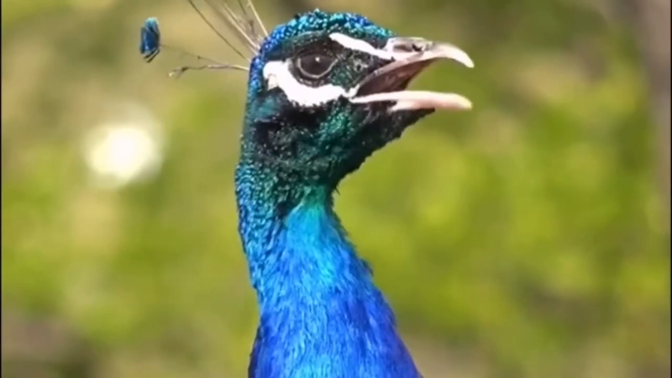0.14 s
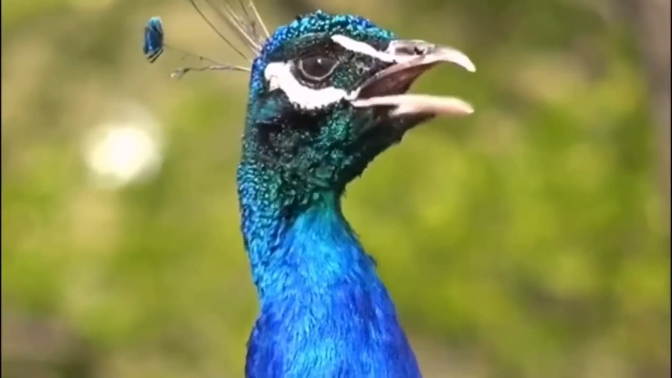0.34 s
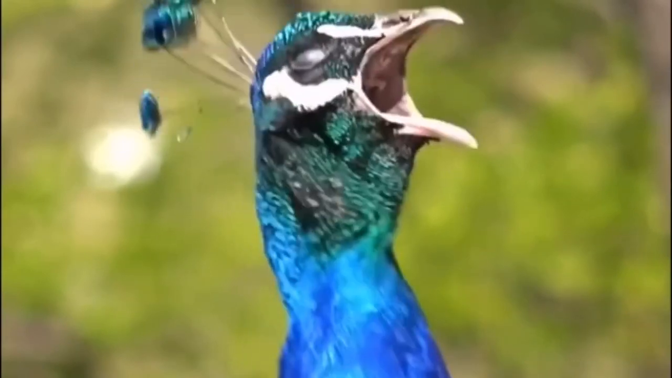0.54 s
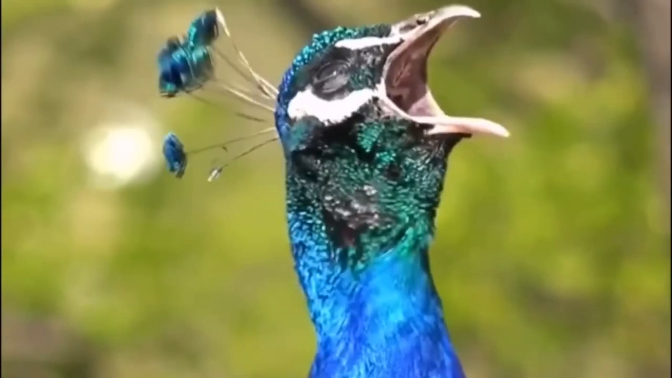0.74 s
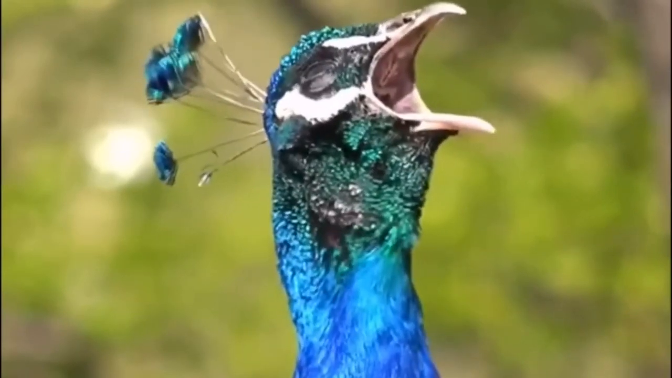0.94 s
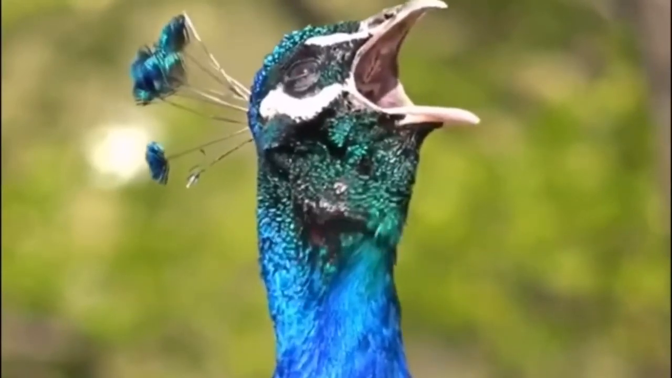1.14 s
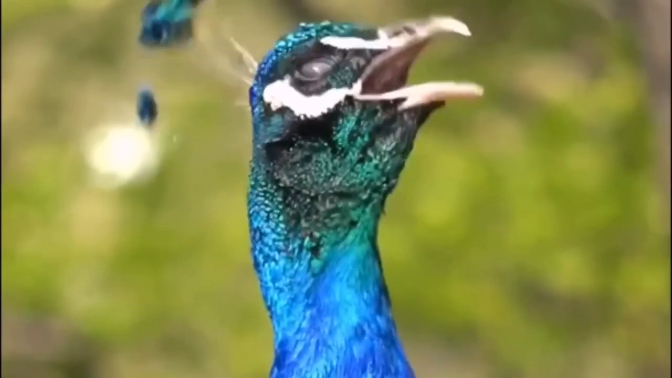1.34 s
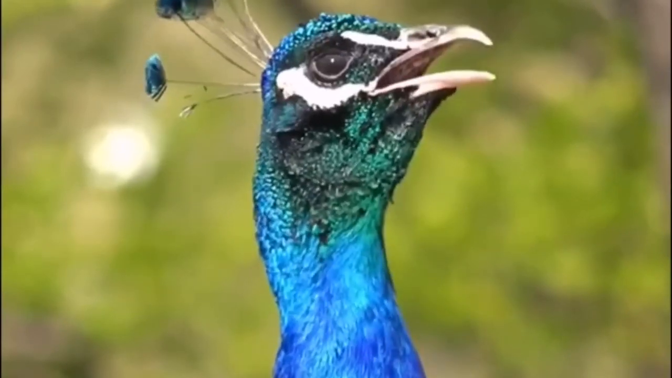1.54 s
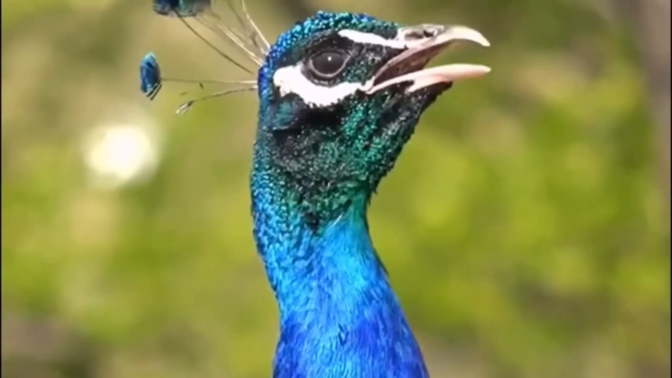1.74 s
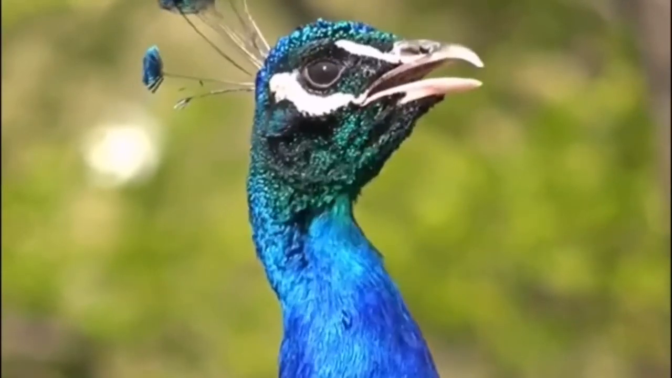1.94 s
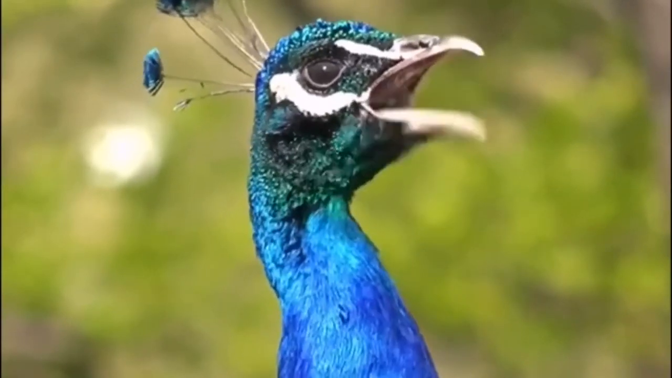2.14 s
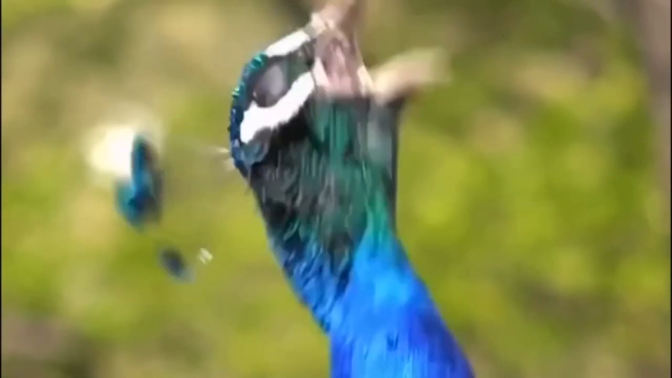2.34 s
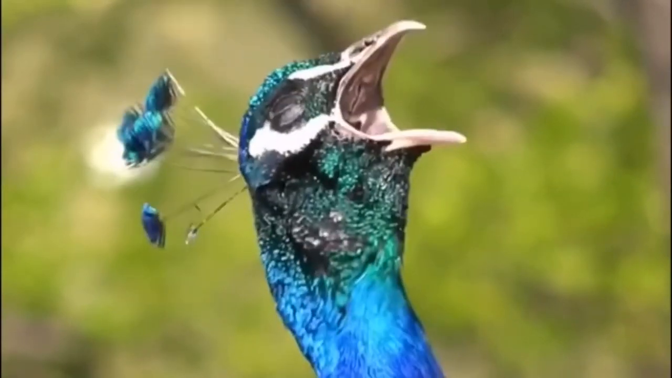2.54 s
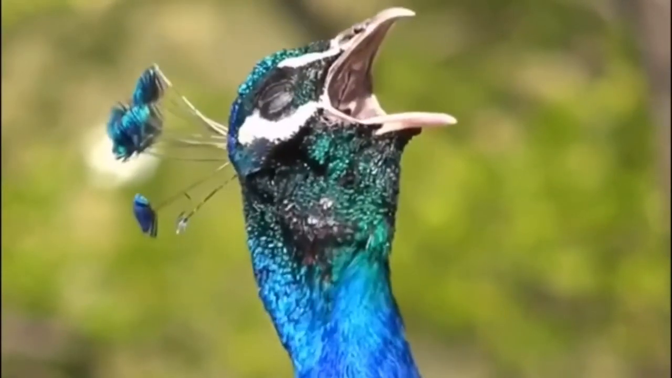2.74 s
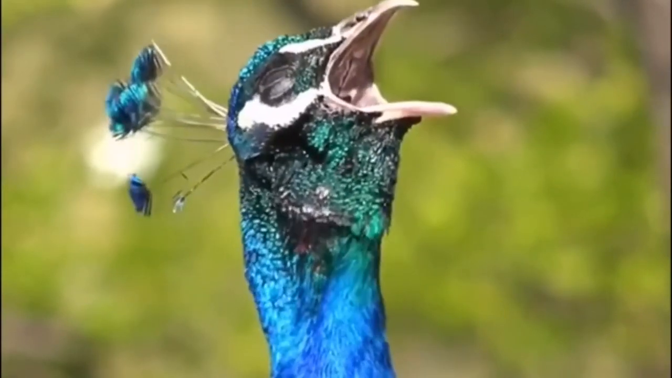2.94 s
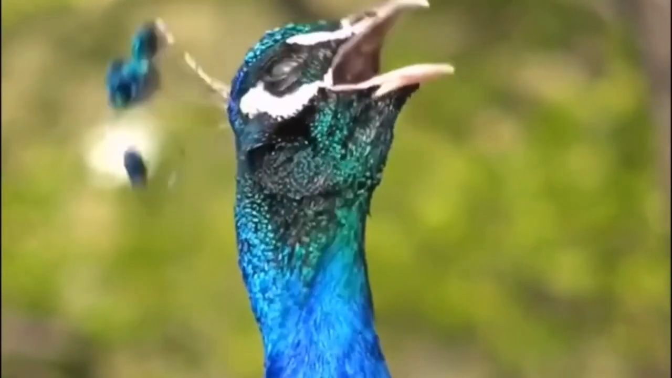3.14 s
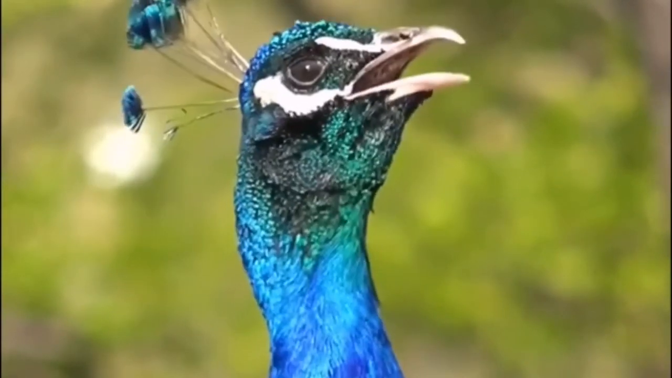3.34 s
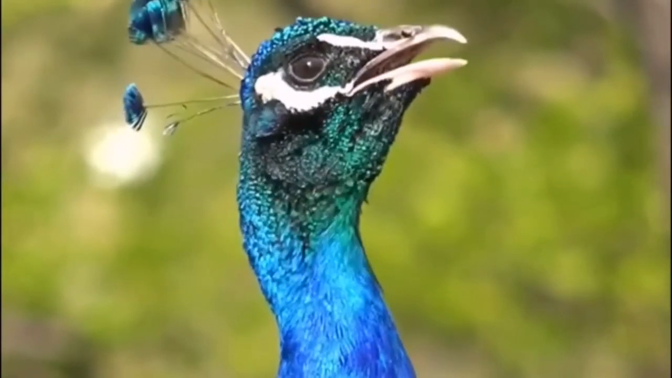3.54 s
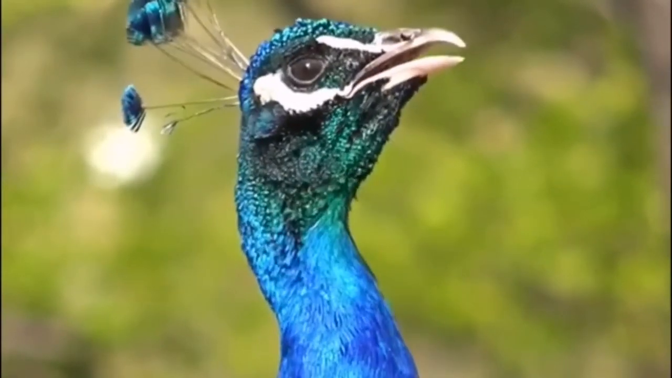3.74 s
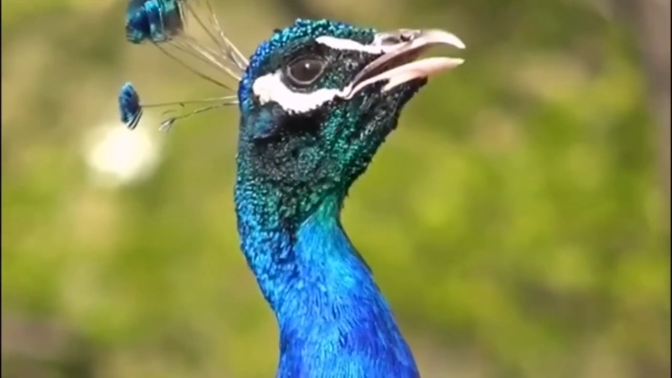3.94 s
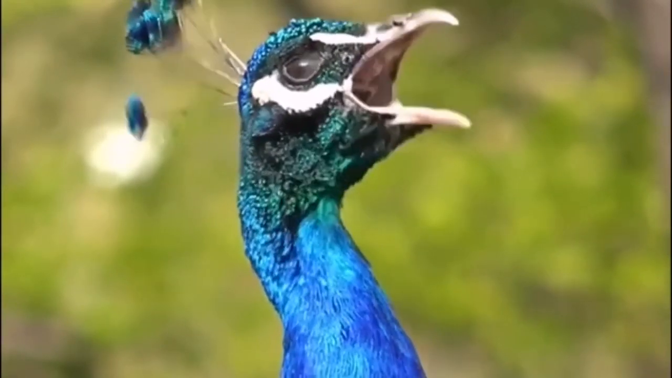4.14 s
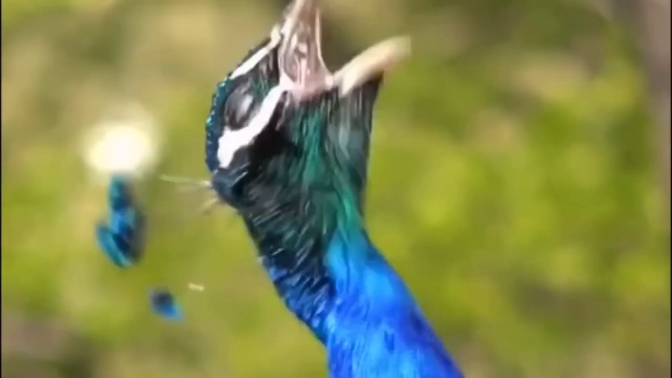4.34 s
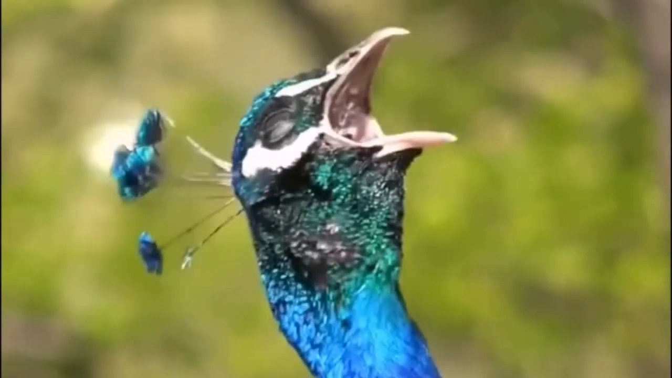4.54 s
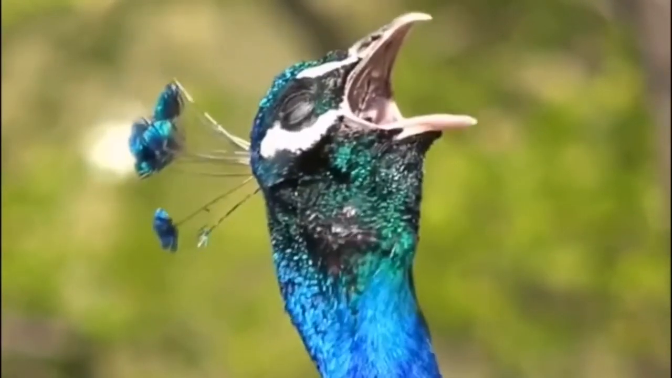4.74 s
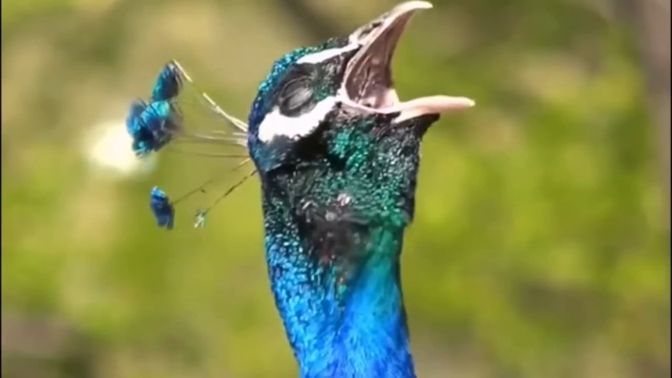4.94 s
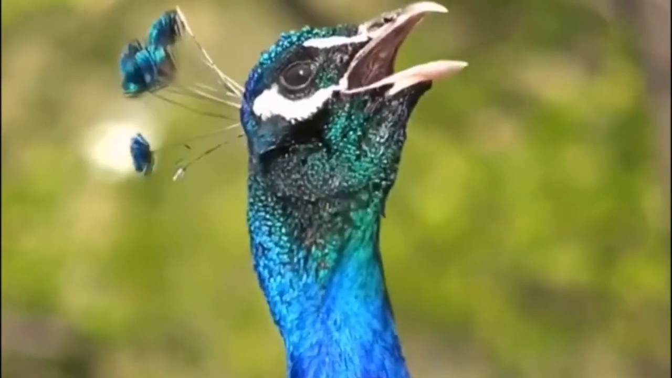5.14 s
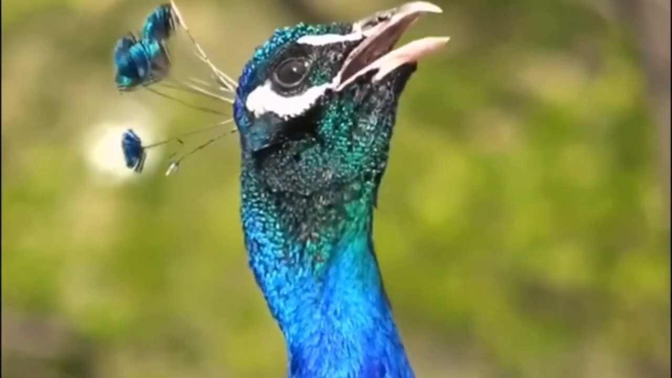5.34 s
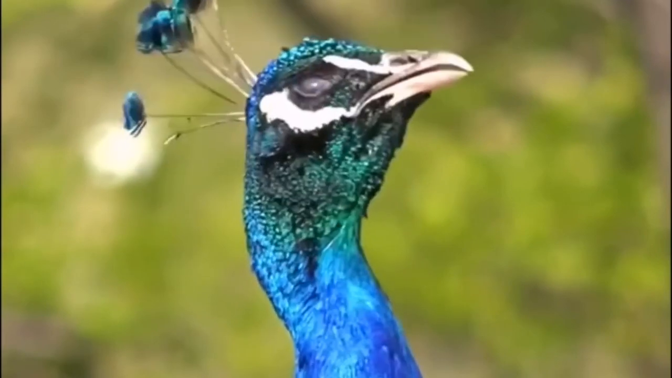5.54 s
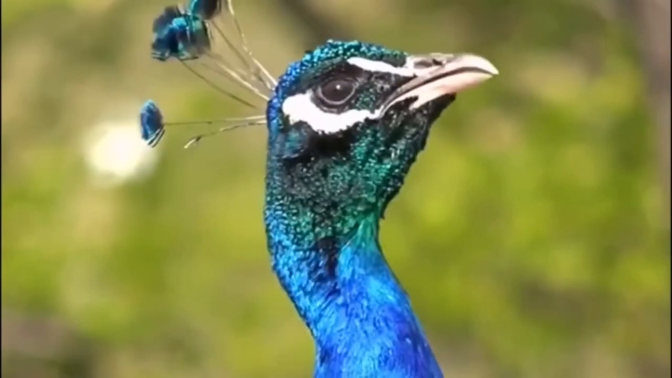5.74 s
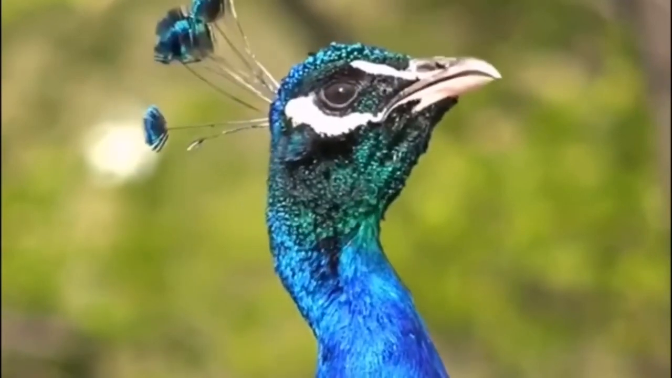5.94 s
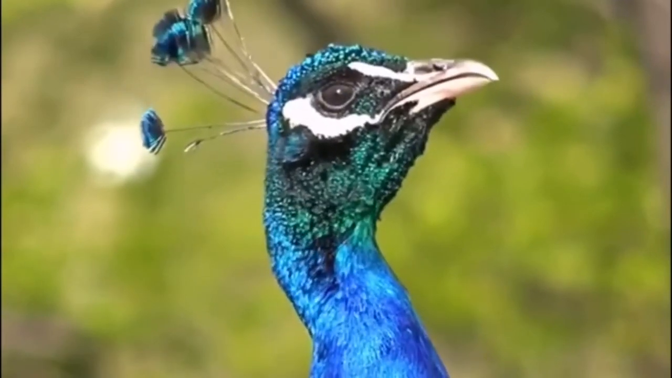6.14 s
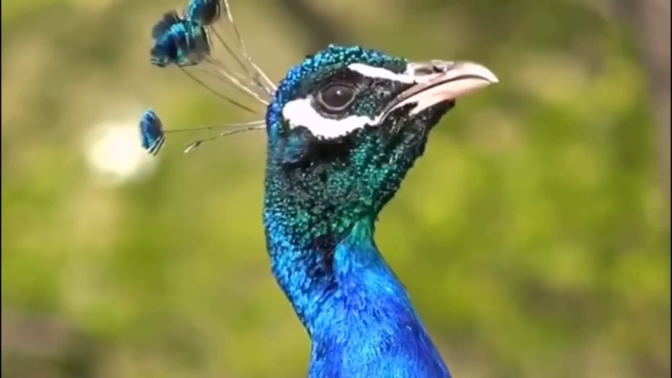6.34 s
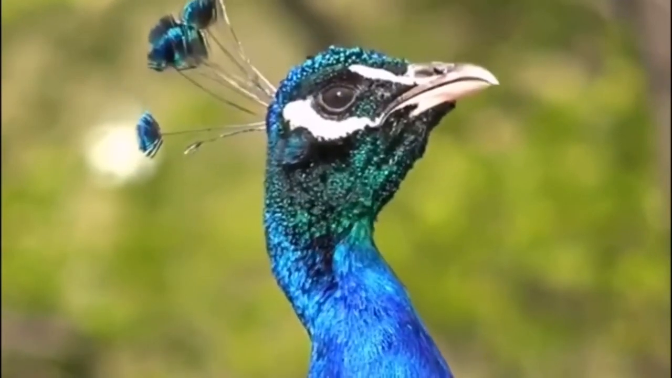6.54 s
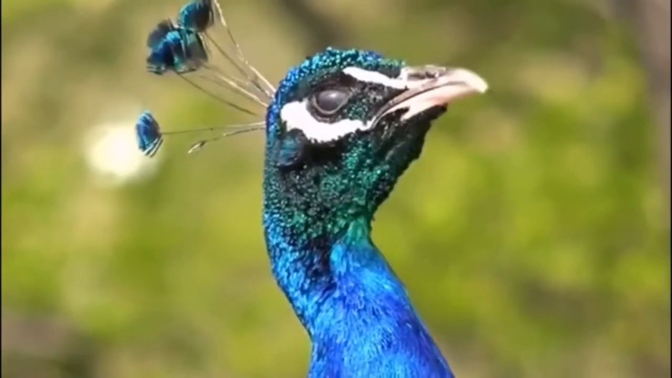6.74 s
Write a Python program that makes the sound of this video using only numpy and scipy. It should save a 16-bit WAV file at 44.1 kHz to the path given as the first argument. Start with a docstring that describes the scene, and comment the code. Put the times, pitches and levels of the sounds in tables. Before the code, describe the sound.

Outdoors in a leafy park, a nearby peacock gives three loud, nasal screams about two seconds apart. Each slides up hoarsely, breaks into a clear held note, then droops in pitch and stops, leaving echoes in the trees. Faint songbird chirps and soft hisses appear between calls over distant traffic rumble and a low hum. The close stereo pickup turns the background down under the cries, then lets it recover.

```python
"""A peacock screams three times in a park: a stack of partials glides up, breaks into a held note and sinks.
Delayed reflections and a tail from trees let the gliding tone beat against its own echoes.
Songbirds (gliding sines), puffs of high hiss, far traffic (shaped noise) and a hum (a narrow noise band)
fill the pauses; gain control, driven by the power of the mix, turns everything down under the screams.
The two channels differ in a balance that depends on frequency and time."""
import sys
import numpy as np
from scipy import signal
from scipy.fft import rfft, irfft, next_fast_len
from scipy.io import wavfile
from scipy.ndimage import uniform_filter1d

SR = 44100
rng = np.random.default_rng(int(sys.argv[2]) if len(sys.argv) > 2 else 0)


def wrap_up_sound(samples):
    """Save the sound to the file named by the first command line argument, as 16-bit audio."""
    columns = np.atleast_2d(samples).T
    # keep every value between -1 and 1, then stretch to whole-number steps
    tamed = np.clip(columns, -1, 1)
    steps = np.round(tamed * 32767).astype(np.int16)
    wavfile.write(sys.argv[1], SR, steps)


N = 299439
FADE_S = 6.675  # start of the fade-out, where the rumble is at its height


def gain_of(db):
    """Converts a level in decibels to an amplitude factor."""
    return 10 ** (np.asarray(db) / 20)


def evened(x):
    """Normalizes a signal to unit rms."""
    return x / np.sqrt(np.mean(x ** 2) + 1e-20)


def read(points, hz):
    """Interpolates a spectrum linearly along a logarithmic frequency axis."""
    f, value = np.transpose(points)
    return np.interp(np.log(hz + 1), np.log(f + 1), value)


def add(mix, s, sound):
    """Superposes a sound on the mix at time s, in place."""
    part = mix[round(s * SR):][:len(sound)]
    part += sound[:len(part)]


def coloured(x, gain):
    """Filters by multiplying the spectrum with a gain given as a function of frequency."""
    size = next_fast_len(x.shape[-1])
    spectrum = rfft(x, size) * gain(np.fft.rfftfreq(size, 1 / SR))
    return irfft(spectrum, size)[..., :x.shape[-1]]


def wobble(count, width):
    """Smooth random modulation of unit rms: white noise averaged twice over width samples."""
    once = uniform_filter1d(rng.standard_normal(count), int(width))
    return evened(uniform_filter1d(once, int(width)))


def scream(row, pitch):
    """Source-filter voice: harmonic partials and breath pass a throat that narrows once the top note is reached."""
    # throat resonances while the pitch climbs: (frequency [Hz], relative gain [dB])
    climb = [(500, -42.5), (650, -31), (1100, -34.5), (1300, -31), (1650, -32.5), (1900, -19.5), (2250, -9),
             (2600, -27.5), (2950, -9), (3150, -19.5), (3450, -42), (3950, -30), (4350, -27), (4750, -39),
             (5200, -33), (5800, -36), (6200, -34), (15000, -71)]
    # throat resonances while the note is held and sinks: (frequency [Hz], relative gain [dB])
    hold = [(520, -49.5), (690, -33.5), (1050, -22), (1400, -17.5), (1700, -35), (1950, -43), (2150, -43),
            (2450, -44), (2720, -39), (3300, -32), (4300, -40.5), (5400, -37.5), (7000, -52.5),
            (8300, -56.5), (10500, -51), (15000, -60.5)]
    # strength of partials 1 to 11 of the held note at the source: relative level [dB]
    folds_db = [0, -1.5, 4.5, 3, -7, 0.5, 7.5, 8, -0.5, -1.5, 0]
    # narrow gaps in the voice's spectrum: (centre [Hz], width at half depth [Hz], depth [dB])
    gaps = [(2820, 105, 20), (3680, 120, 15.5), (4803, 334, 15), (5770, 280, 16)]
    # course shared by all screams, before each scream's own offsets; stage 0 is the start, 1 the break, 2 the end:
    # (stage [1], two lowest partials [dB], overtones [dB], treble [dB], throat width [0-1])
    course = [(0, -30.5, -28.5, -65, 1), (.25, -26, -19.5, -55, .93), (.55, -26, -15, -39.5, 0.88),
              (1, -22.5, -16.5, -41, 0.78), (1.02, -17, -21.5, -37.5, 0.74), (1.06, -13, -23, -39, 0.37),
              (1.14, -13, -23.5, -32.5, 0.48), (1.3, -13.5, -24.5, -36.5, 0.19),
              (1.62, -10.5, -31, -53.5, 0.05), (1.8, -14.5, -32, -50, .16), (1.92, -19, -29, -48.5, .5),
              (1.976, -30, -35.5, -53.5, 0.42), (2.001, -41.5, -49.5, -65, .5)]
    treble_hz = 6000  # lower limit of the treble group
    dulling = .45  # dB per octave that the voice darkens for each dB that the treble weakens
    surge_db = 2.2  # rms at full throat width
    attack_s, release_s = 0.0099, .015
    breath_climb_db, breath_hold_db = -9, -27  # against the treble, throat wide and narrow
    burst_delay_s, burst_s = .015, .015  # peak after the break, Gaussian half-width at 1/e

    snap, level_db, climb_db, extra_db, burst_db = row
    start, end = pitch[0][0], pitch[-1][0]
    t = np.arange(start, end, 1 / SR)
    stage = np.interp(t, [start, snap, end], np.arange(3))
    at, *columns = np.transpose(course)
    low_db, overtones_db, treble_db, wide = (np.interp(stage, at, c) for c in columns)
    treble_db = treble_db + extra_db
    wide = np.clip(wide, 0, 1)

    hz = uniform_filter1d(np.interp(t, *np.transpose(pitch)), size=700, mode="nearest")
    hz = hz * (1 + .0004 * wobble(len(t), width=300))
    k = np.arange(1, 29)[:, None]  # partial numbers
    f = k * hz

    source_db = np.interp(k, 1 + np.arange(len(folds_db)), folds_db)
    throat = gain_of(wide * read(climb, f) + (1.5 - wide) * (read(hold, f) + source_db))
    throat = throat * gain_of(dulling * (treble_db + 39) * np.log2(np.maximum(f / 5800, 1)))

    # within each group the throat shares out the power
    groups = [(k <= 2, low_db), ((k > 2) & (f < treble_hz), overtones_db), (f >= treble_hz, treble_db)]
    size = 0
    for member, db in groups:
        power = uniform_filter1d((member * throat ** 2).sum(0), size=1500)
        size = size + member * throat * gain_of(db) / np.sqrt(power)
    gap_db = sum(depth / (1 + (2 * (f - centre) / width) ** 2) for centre, width, depth in gaps)
    size = size * gain_of(-gap_db) * (f < SR / 2.2)  # no partials near the Nyquist limit

    def chance(width):
        return np.array([wobble(len(t), width) for _ in k])  # independent for each partial

    flutter = gain_of(np.clip(.5 * (k - 4), .4, 5.) * chance(900))  # high partials flicker most
    rasp = 1 + wide * np.clip(.08 * (k - 6), 0, .8) * chance(44)  # the climb is hoarse on top
    surge = gain_of(surge_db * wide * (k > 2) * chance(1300))  # overtones swell and drop out by turns
    size = size * rasp * surge * flutter
    phase = 2 * np.pi * (k * np.cumsum(hz) / SR + rng.random(k.shape))
    tone = np.sqrt(2) * (size * np.cos(phase)).sum(0)

    breath_db = treble_db + wide * breath_climb_db + (1 - wide) * breath_hold_db
    burst = gain_of(burst_db) * np.exp(-((t - snap - burst_delay_s) / burst_s) ** 2)
    noise = rng.standard_normal(len(t))
    breath = evened(coloured(noise, lambda f: f ** 1.8 / (1 + (f / 9500) ** 7)))
    edges = np.clip(np.minimum((t - start) / attack_s, (end - t) / release_s), 0, 1) ** 2
    voice = tone + (gain_of(breath_db) + burst) * breath
    return start, gain_of(level_db + wide * climb_db) * edges * voice


def park(x, far):
    """Discrete reflections of the near sound x, then scattering of both sounds whose treble mostly dies first."""
    # single reflections: (delay [s], level before colouring [dB])
    echoes = [(0.0413, -6.5), (0.0546, -21), (0.1003, -17), (0.138, -23)]
    # spectrum of the reflections: (frequency [Hz], gain [dB])
    echo_colour = [(500, -5.5), (1400, -2), (1800, -7), (3000, -11.5), (6000, -20.5), (15000, -40)]
    # reverberation time of the late tail from the trees: (frequency [Hz], T60 [s])
    trees = [(500, 4.3), (1100, 0.86), (1300, 2.11), (1600, 1.2), (2500, 0.82), (6000, 1.23), (15000, 0.26)]
    # colour of the tail, strongest around 2 to 4.5 kHz: (frequency [Hz], gain [dB])
    trees_colour = [(500, 2), (1300, 0), (2000, 6.5), (4500, 7), (8000, 4), (15000, -1.5)]
    near_db, far_db = -17.5, -8.5  # sent into the tail

    hard = np.zeros(N)
    for delay, db in echoes:
        add(hard, delay, gain_of(db) * x)

    # sparse impulse response: one tap of random sign in every 20 samples
    taps = np.zeros(2 * SR)
    at = np.arange(900, 2 * SR - 20, 20)
    taps[at + rng.integers(0, 20, at.shape)] = rng.choice([-1., 1.], at.shape)
    hz, t, z = signal.stft(taps, SR, nperseg=256)
    t60 = read(trees, hz)[:, None]
    # near bushes die fast, far trees linger
    fall_db = np.maximum(-60 * t / (0.24 * t60), -16 - 60 * t / t60)
    tail = signal.istft(z * gain_of(fall_db), SR, nperseg=256)[1]
    tail /= np.linalg.norm(tail[:SR])

    wet = signal.fftconvolve(gain_of(near_db) * x + gain_of(far_db) * far, tail)[:N]
    wet = coloured(wet, lambda f: gain_of(read(trees_colour, f)))
    return coloured(hard, lambda f: gain_of(read(echo_colour, f))) + wet


def songbirds():
    """Frequency-modulated whistles: gliding sines that flicker and blur on their way through leaves."""
    # notes, before random flicker and pitch wander:
    # (time [s], length [s], start frequency [Hz], end frequency [Hz], level [dB])
    notes = [(0.145, 0.046, 4950, 5000, -52), (0.18, 0.033, 4900, 5400, -56), (.2, 0.027, 3750, 3500, -56),
             (0.212, 0.049, 3480, 4860, -52.5), (0.227, 0.052, 3200, 3000, -53),
             (0.296, 0.042, 3700, 4800, -64), (2.058, 0.13, 6030, 6430, -52.5),
             (3.758, 0.039, 6520, 6300, -55), (5.5, 0.21, 6860, 6850, -64), (5.64, 0.053, 5100, 3700, -51),
             (5.707, 0.074, 4860, 3300, -50.5), (5.768, 0.046, 3100, 3100, -52),
             (5.888, 0.1, 6150, 6180, -58.5), (6.022, 0.14, 3750, 3750, -60),
             (6.249, 0.22, 3240, 3130, -52), (6.384, 0.04, 4640, 4820, -51), (6.475, 0.06, 4650, 4570, -59),
             (6.486, 0.13, 6550, 6550, -62.5), (6.525, 0.079, 5300, 3400, -47),
             (6.594, 0.038, 5400, 3650, -47.5), (6.608, 0.023, 4400, 3230, -48)]
    out = np.zeros(N)
    for s, length, hz0, hz1, db in notes:
        n = round(length * SR)
        glide = hz0 + (hz1 - hz0) * np.sin(np.linspace(0, np.pi / 2, n)) ** 2
        glide = glide + 60 * wobble(N // 20, width=90)[:n]
        flicker = gain_of(db + 2.4 * wobble(N // 20, width=150)[:n])
        whistle = np.sin(2 * np.pi * np.cumsum(glide) / SR)
        add(out, s, flicker * whistle * signal.windows.tukey(n, .6))
    return out


def hisses():
    """Band-pass noise: short puffs of random sound confined to a high band."""
    # puffs: (time [s], length [s], centre [Hz], width between 1/e gains [Hz], level [dB])
    puffs = [(.405, .07, 8200, 2400, -55), (.41, .065, 10500, 6000, -63), (.455, .02, 7500, 2000, -54),
             (3.81, .16, 9000, 800, -64), (3.86, .39, 7600, 900, -59), (3.68, .42, 8200, 2200, -64)]
    out = np.zeros(N)
    for s, length, hz, width, db in puffs:
        n = round(length * SR)
        noise = rng.standard_normal(N // 10)
        band = evened(coloured(noise, lambda f: np.exp(-(2 * (f - hz) / width) ** 4)))
        add(out, s, gain_of(db) * band[:n] * signal.windows.tukey(n, .3))
    return out


def traffic():
    """Spectrally shaped noise, partly coherent between the channels, with a hum from narrow-band noise."""
    # spectrum of the wash before the bass cut: (frequency [Hz], relative density [dB per Hz])
    spectrum = [(12, -48.5), (25, -30), (40, -5.5), (60, 1), (115, -2.5), (250, -9), (420, -13),
                (640, -18.5), (1020, -22), (2000, -27.5), (4000, -29.5), (6200, -36), (8000, -43),
                (15000, -60)]
    traffic_db = -41.5
    hum_hz, hum_width_hz, hum_db = 116.9, 4.2, -7  # level against the traffic
    rumble_hz, rumble_from_s, rumble_db = 200, 5.3, -2.5  # the low rumble grows from that time

    frames, hz = N // 256 + 5, np.fft.rfftfreq(1024, 1 / SR)
    a, b, c, d, patches = rng.standard_normal((frames, 513, 5)).T
    patches = evened(uniform_filter1d(uniform_filter1d(patches, 14, 0), 16, 1))
    gusts = wobble(frames, width=5.5)
    mid, side = a + 1j * b, gain_of(-26) * (c + 1j * d)
    level_db = read(spectrum, hz)[:, None] + 1.4 * patches + 0.45 * gusts
    z = np.array([mid + side, mid - side]) * gain_of(level_db)
    wash = evened(signal.istft(z, nperseg=1024, noverlap=768)[1][:, :N])
    wash = coloured(wash, lambda f: 1 / (1 + (45 / (f + 1)) ** 4))  # little deep bass below about 45 Hz

    noise = rng.standard_normal(N)
    hum = evened(coloured(noise, lambda f: 1 / (1 + (2 * (f - hum_hz) / hum_width_hz) ** 2)))
    growth = np.interp(np.arange(N) / SR, [rumble_from_s, FADE_S], [0, 1])
    rumble = coloured(wash, lambda f: 1 / (1 + (f / rumble_hz) ** 4)) * growth
    return gain_of(traffic_db) * (wash + gain_of(rumble_db) * rumble + gain_of(hum_db) * hum)


def ducked(x):
    """Feed-forward gain control: short-time power above a threshold sets a cut that recovers slowly."""
    from_db, share = -25, 0.22  # threshold, and dB of cut for each dB above it
    smoothing_s, back_db_per_s = 0.23, 1.5
    power_db = 10 * np.log10(abs(uniform_filter1d((x ** 2).mean(0), size=2000)) + 1e-12)
    back = np.arange(N) * back_db_per_s / SR
    # peak hold that falls back at a constant rate
    cut_db = np.maximum.accumulate(share * np.maximum(power_db - from_db, 0) + back) - back
    r = np.exp(-1 / (smoothing_s * SR))
    return x / gain_of(signal.lfilter([1 - r], [1, -r], cut_db))


def scene():
    """Superposition of sources: the peacock stands near, the songbirds far off in the trees."""
    # screams: (voice break [s], level offset [dB], extra level of the climb [dB], extra treble [dB],
    # burst of air at the break before the level offsets [dB])
    screams = [(0.565, 1, -1.5, 1, -56), (2.432, 1, 1, 0., -46.5), (4.458, 1, 1.5, 0.5, -35.5)]
    # one pitch curve a scream, from its start to its end: (time [s], fundamental [Hz])
    pitches = [
        [(.493, 530), (.524, 557), (.595, 660.4), (.63, 685), (.72, 681.1), (.93, 642.2), (1.04, 617),
         (1.13, 588), (1.2, 554.4), (1.25, 517)],
        [(2.228, 530.6), (2.255, 541.5), (2.37, 615.4), (2.425, 646.5), (2.457, 688.4), (2.545, 692),
         (2.73, 655), (2.85, 625.4), (2.95, 589.7), (3.03, 555.6), (3.09, 509.4)],
        [(4.221, 531), (4.24, 539), (4.33, 604), (4.433, 636.5), (4.49, 688.2), (4.56, 689.6), (4.73, 660),
         (4.83, 630.5), (4.92, 591.8), (4.99, 558.3), (5.045, 509)],
    ]
    direct_db = -1  # share of the songbirds that arrives without passing the trees
    peacock, small = np.zeros(N), songbirds()
    for row, pitch in zip(screams, pitches):
        add(peacock, *scream(row, pitch))
    return peacock + gain_of(direct_db) * small + park(peacock, small) + hisses() + traffic()


def record(dry):
    """Gain control, then level differences between the channels by frequency and time, fade-out and low-pass."""
    # steady balance outside the middle band: (frequency [Hz], left minus right [dB])
    lean = [(25, -1), (60, -.5), (125, .6), (250, 2.6), (600, 2.2), (2000, 1.6), (5000, .8), (8000, -1.8),
            (12000, .2)]
    # balance of the middle band near 1.2 kHz, which sways: (time [s], left minus right [dB])
    sway = [(0.0, 3), (0.13, 8.0), (0.74, 0.5), (1.26, 3.5), (1.35, 8.5), (1.63, 0), (2.21, 5), (2.59, 0.5),
            (2.8, 7.0), (3.04, 1.5), (3.17, 6.5), (3.41, 1), (4.12, 8.5), (4.38, -1.0), (4.8, 8.0),
            (4.97, 0), (5.15, 8.5), (5.36, 2), (5.9, 7.5), (6.66, 6)]
    # random wavering of the balance outside the middle band: (frequency [Hz], rms [dB])
    waver = [(300, 0.07), (2000, 1.5), (4500, 1), (8000, 4.5), (12000, 5)]
    fade_db_per_s, edge_hz = 1209, 15200

    hz, t, z = signal.stft(ducked(dry), SR, nperseg=1024, noverlap=768)
    middle = np.exp(-(np.log(hz / 1200 + 1e-9) / 0.53) ** 4)[:, None]
    lean_db = (1 - middle) * read(lean, hz)[:, None] + middle * np.interp(t, *np.transpose(sway))
    patches = uniform_filter1d(rng.standard_normal(lean_db.shape), size=24, axis=0)
    patches = evened(uniform_filter1d(patches, size=20, axis=1))
    ratio = gain_of(lean_db + (1 - middle) * read(waver, hz)[:, None] * patches)  # left over right
    z = z * np.array([2 * ratio / (1 + ratio), 2 / (1 + ratio)])
    out = signal.istft(z, SR, nperseg=1024, noverlap=768)[1][:, :N]
    out = out * gain_of(-fade_db_per_s * np.maximum(np.arange(N) / SR - FADE_S, 0))
    low_pass = signal.firwin(511, edge_hz, window=("kaiser", 9), fs=SR)
    return signal.oaconvolve(out, low_pass[None], "same")


dry = scene()
out = record(dry)
wrap_up_sound(out)
```